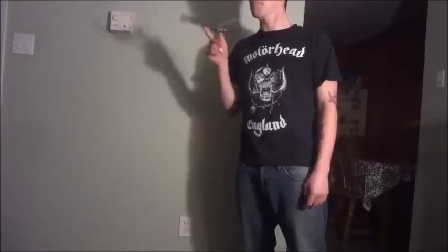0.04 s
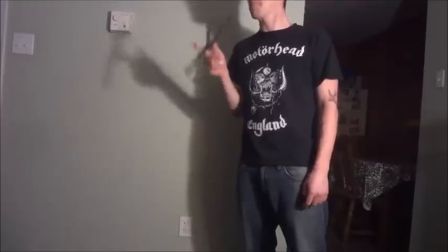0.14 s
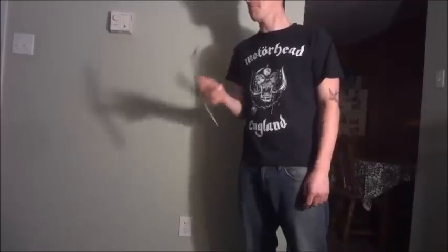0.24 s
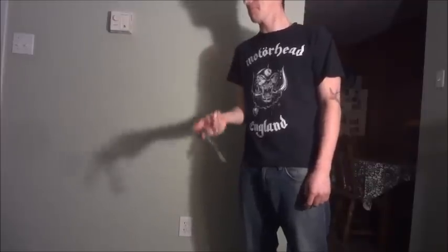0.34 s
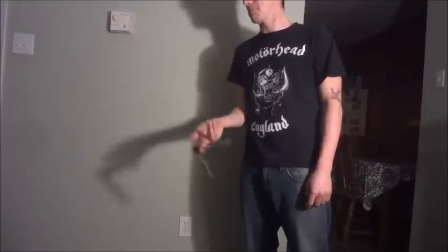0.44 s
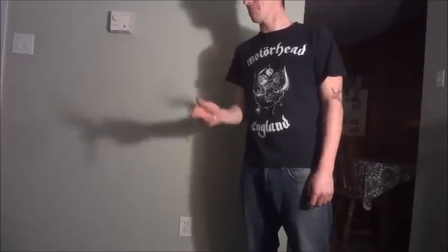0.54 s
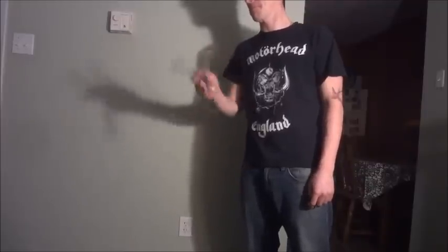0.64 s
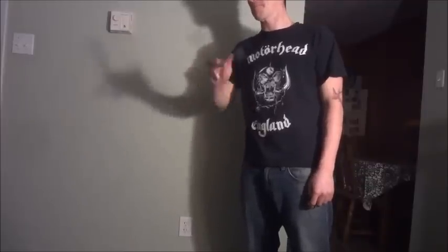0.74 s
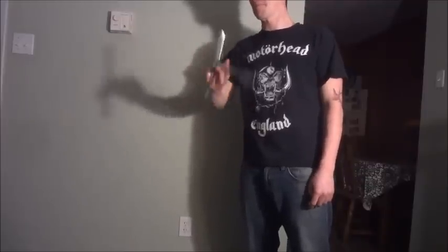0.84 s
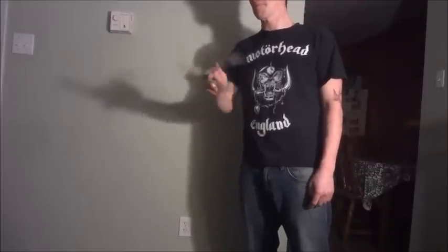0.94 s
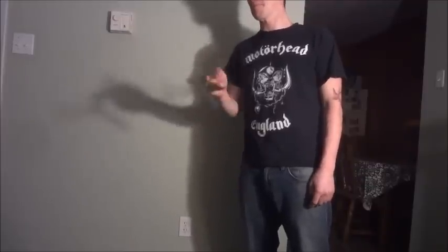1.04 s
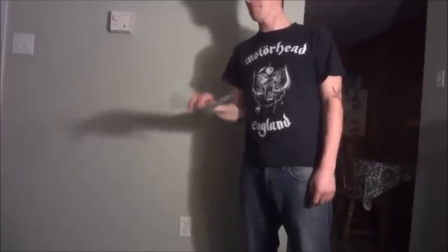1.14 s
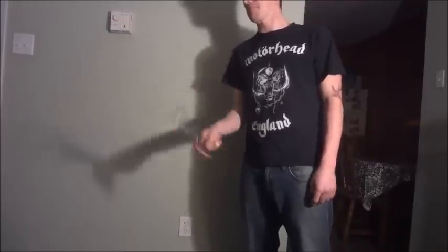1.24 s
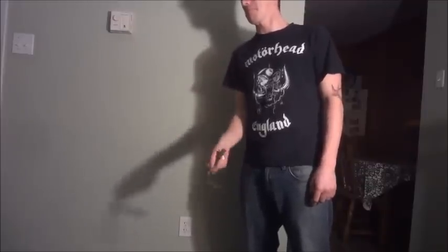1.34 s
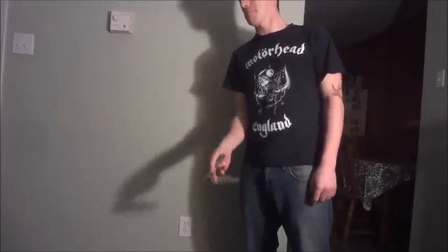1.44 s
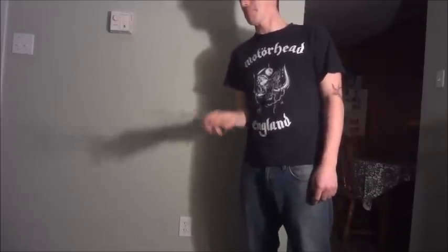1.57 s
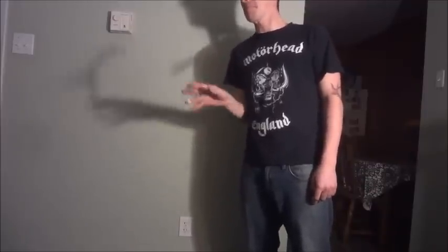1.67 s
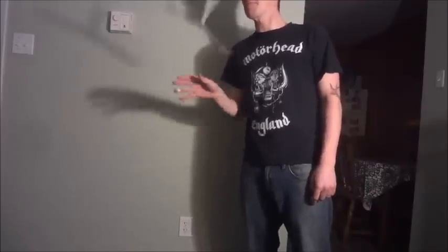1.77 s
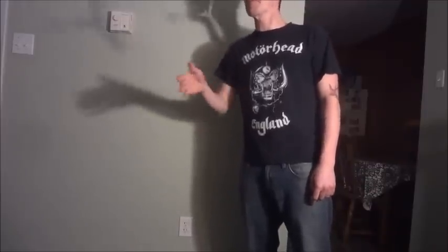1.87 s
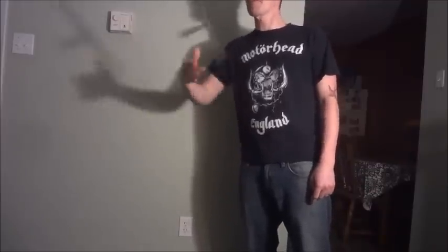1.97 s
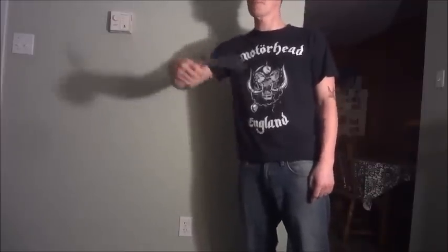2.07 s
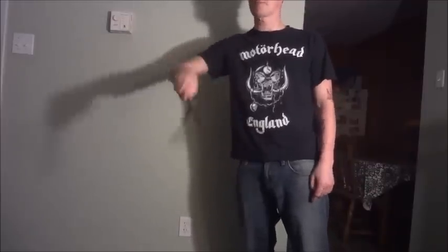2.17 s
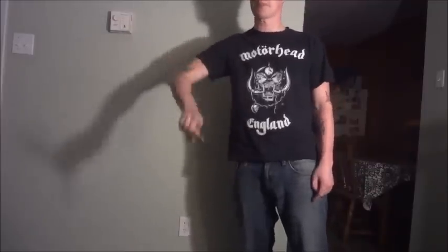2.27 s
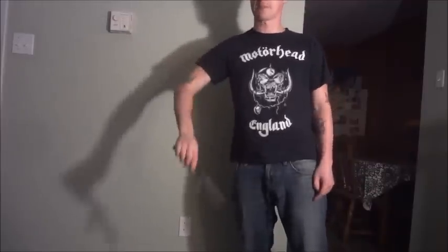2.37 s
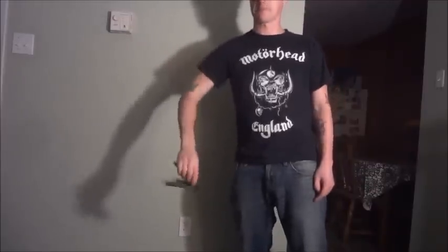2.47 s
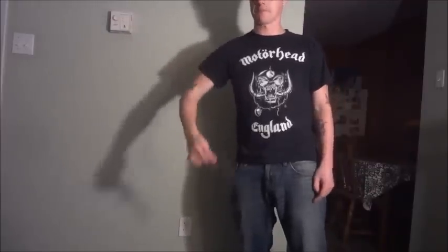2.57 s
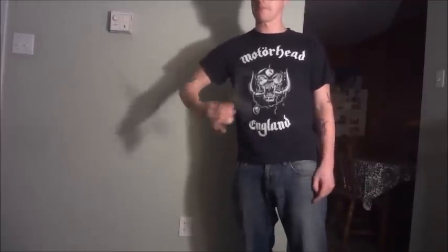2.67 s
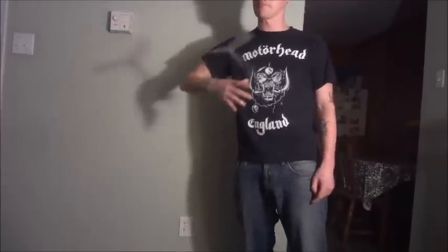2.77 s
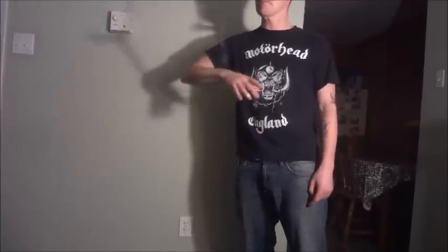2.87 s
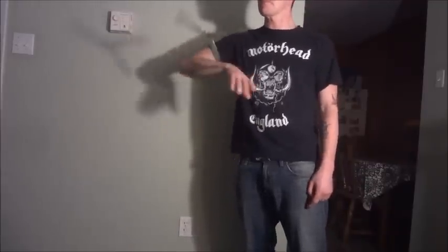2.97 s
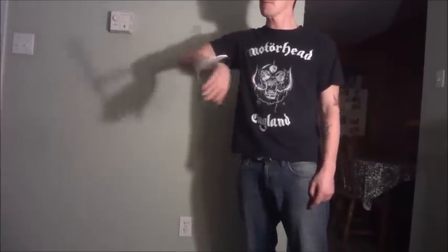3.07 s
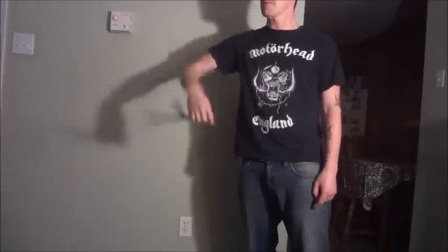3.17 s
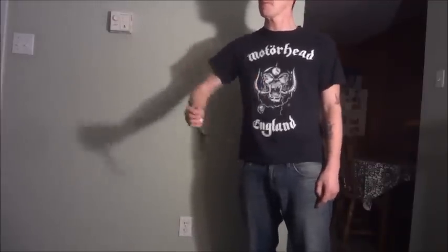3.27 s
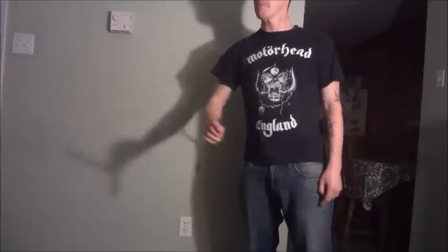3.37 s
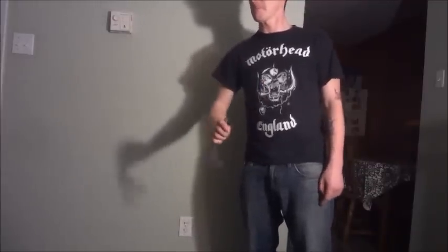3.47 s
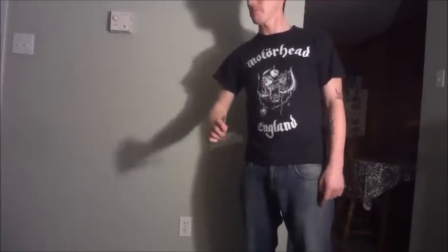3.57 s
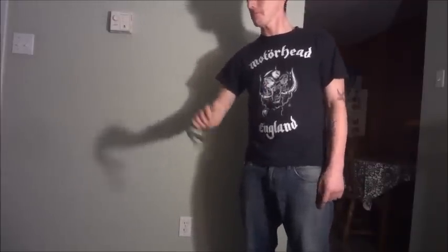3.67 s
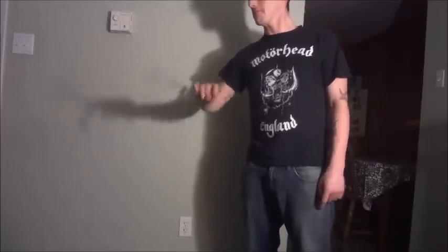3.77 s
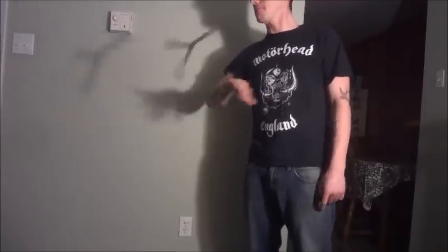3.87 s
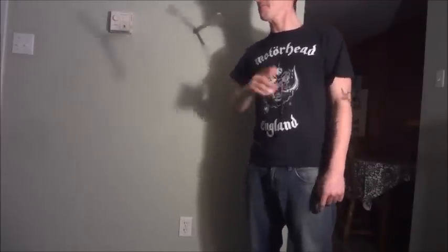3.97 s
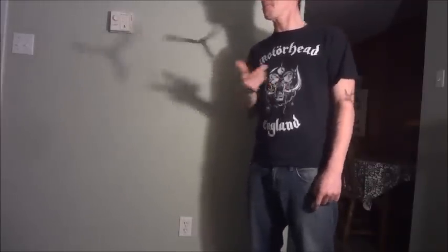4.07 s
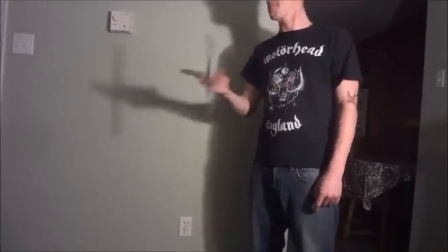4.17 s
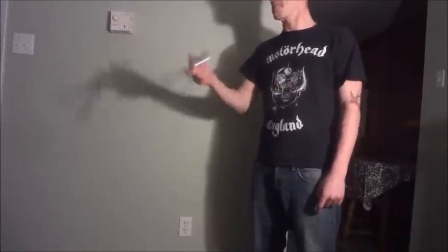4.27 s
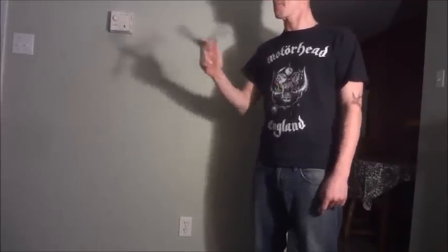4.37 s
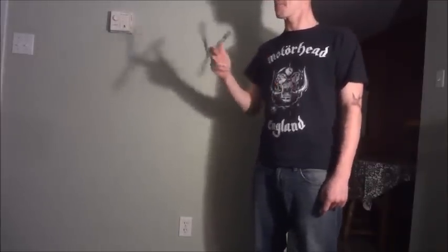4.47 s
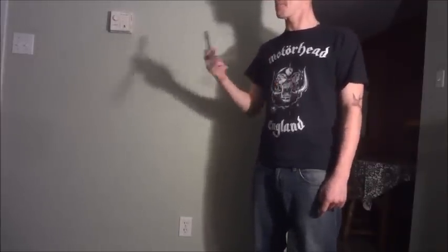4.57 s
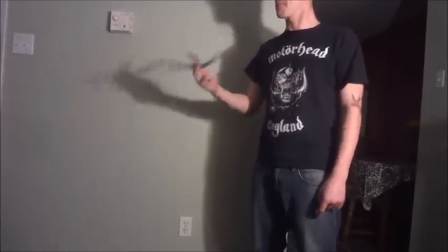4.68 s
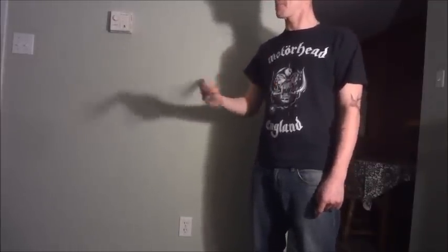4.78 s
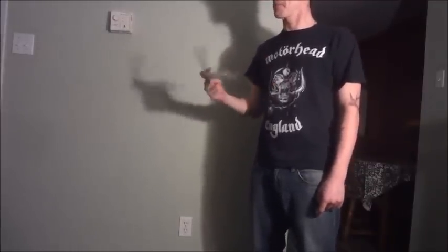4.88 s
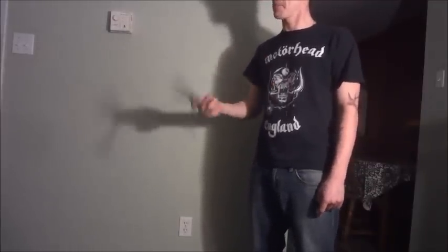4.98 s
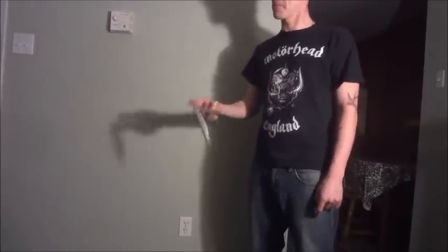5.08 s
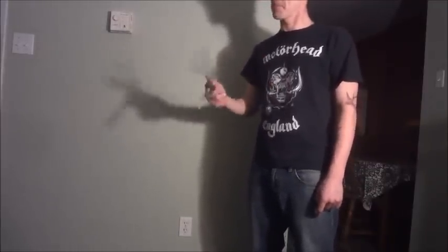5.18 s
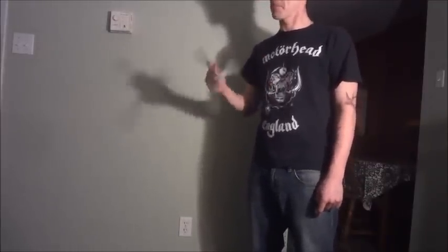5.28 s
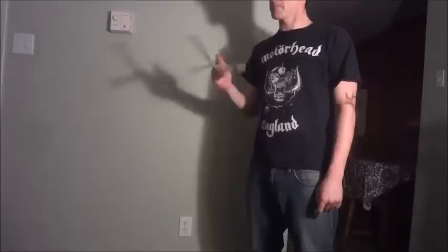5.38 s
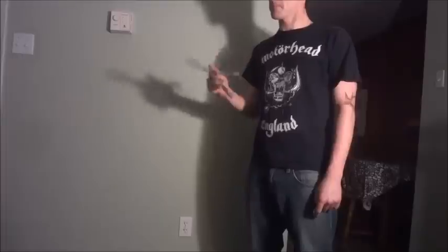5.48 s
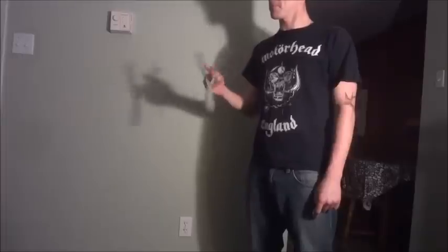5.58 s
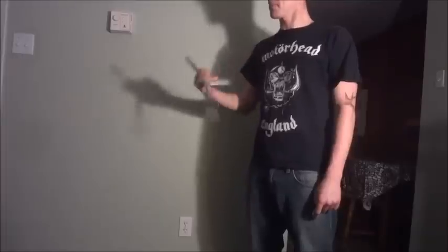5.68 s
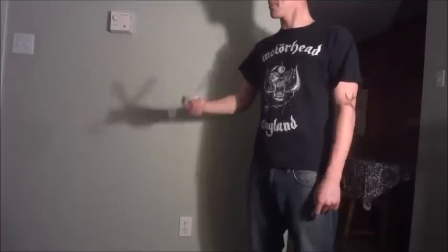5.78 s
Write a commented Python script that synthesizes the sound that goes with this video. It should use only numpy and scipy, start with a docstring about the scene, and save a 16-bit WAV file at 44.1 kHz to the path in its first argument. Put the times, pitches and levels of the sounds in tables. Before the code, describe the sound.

Sharp, irregular steel clacks and tiny loose-pivot chatter come in bursts as a butterfly knife is flipped indoors, over quiet electrical hum.

```python
"""A folding knife with two swinging handles is flipped a few metres away in a small bare room.
First only hum, thin whines and hiss are heard; from 0.4 s to 5.8 s the handles click in groups. Each click is
a crack of noise with ringing steel, then a chatter of tiny blows. After clacks the loose pivots rattle
and parts of the knife sing fading, fluttering notes; a few catches in the palm add soft thuds of low noise.
A near wall answers each sound at once, then the room fades fast as dying bands of noise."""
import sys
import numpy as np
from scipy import signal
from scipy.fft import rfft, irfft, next_fast_len
from scipy.io import wavfile

SR = 44100
rng = np.random.default_rng(int(sys.argv[2]) if len(sys.argv) > 2 else 0)


def file_out(sig):
    """Save sig as 16-bit WAV at sys.argv[1]."""
    # one column per channel
    cols = np.atleast_2d(sig).T
    # limit, then scale
    lim = np.clip(cols, -1, 1)
    pcm = np.round(lim * 32767).astype(np.int16)
    wavfile.write(sys.argv[1], SR, pcm)


N = 256662  # length in samples

# Steel hits steel: t/s, level/dB, centre of brightness f/Hz
CLICK_EVENTS = [(.411, -36, 11000), (0.4886, -16, 8700), (0.5087, -9, 8200), (0.5257, -15.5, 9100),
                (0.5378, -13.5, 9200), (0.6304, -26, 11200), (0.6753, -33, 10800), (.756, -47, 9300),
                (.8862, -44.5, 7500), (0.9267, -11.5, 10600), (0.9442, -14, 9450), (0.9697, -1.5, 10500),
                (1.032, -20.5, 9300), (1.2933, -42.5, 10600), (1.372, -46, 10000), (1.4132, -41, 10900),
                (1.4447, -43.5, 10100), (1.482, -41, 11600), (1.5335, -15.5, 10300), (1.5385, -17, 9900),
                (1.5451, -10.5, 9800), (1.6636, -21.5, 11300), (2.1121, -43, 10000), (2.1378, -39, 11000),
                (2.1593, -28, 11500), (2.2102, -33.5, 11300), (2.2338, -10.5, 10300), (2.2553, -27, 10000),
                (2.4596, -39, 10760), (2.5456, -37.5, 9000), (2.5763, -8, 9900), (2.7566, -37.5, 10740),
                (3.1917, -42, 8900), (3.3131, -34, 9900), (3.3902, -10.5, 8540), (3.4151, -16, 9900),
                (3.5369, -32, 9600), (3.5655, -26.5, 10900), (3.6632, -33.5, 9700), (3.6888, -11.5, 9600),
                (3.7126, -12, 10100), (3.886, -39, 10900), (4.2963, -33, 9100), (4.3, -27, 11700),
                (4.3542, -29, 12000), (4.3819, -17, 9900), (4.387, -18, 9200), (4.3996, -32, 9900),
                (4.4589, -23, 11500), (4.5026, -38, 9600), (4.5219, -25, 9300), (4.5529, -9, 11500),
                (4.5685, -23, 10600), (4.7259, -36, 10500), (4.7848, -45, 9850), (4.8119, -37, 11240),
                (4.8475, -35.5, 9900), (4.887, -11.5, 11500), (4.9249, -10, 9500), (4.9598, -24, 9900),
                (5.087, -45, 8600), (5.1317, -12, 7100), (5.1579, -9, 10700), (5.1951, -6.5, 11500),
                (5.3185, -38, 11600), (5.3773, -40, 11000), (5.4212, -6, 10800), (5.5762, -8.5, 10300),
                (5.6046, -26, 10100), (5.7936, -33, 10700)]
# Bright modes (natural ringing notes) of the handles: f/Hz, relative level/dB, time to fade 60 dB t60/s
BRIGHT_MODES = [(5120, 3, 0.014), (6200, -29, 0.014), (7055, -2.5, 0.052), (7700, -5.5, 0.052),
                (8270, -7, 0.04), (9640, -3.5, 0.01), (11070, -6.5, 0.0073), (11900, -2, 0.01),
                (12090, -6.5, 0.0067), (13890, -6, 0.005), (15900, 1, .015)]


def undb(db):
    """Turn a level in dB into a plain gain."""
    return 10 ** (np.asarray(db) / 20)


def unit(x):
    """Scale a sound to an average strength (rms) of 1."""
    return x / np.sqrt(np.mean(x ** 2))


def colour(x, points):
    """Make some pitches louder or softer, following (Hz, dB) points joined up along log frequency."""
    hz, db = np.transpose(points)
    f = np.arange(len(x) // 2 + 1) * SR / len(x)
    gain = undb(np.interp(np.log(f + 1), np.log(hz), db))
    return irfft(rfft(x) * gain, len(x))


def train(times, sizes):
    """Place single-sample impulses of the given sizes at the given times."""
    return np.bincount((times * SR).astype(int), sizes, N + SR)[:N]


def ring(x, hz, t60):
    """One mode set ringing by x: each impulse starts a sine of its size that fades 60 dB in t60 seconds."""
    radius = np.exp(-np.log(1000) / (t60 * SR))
    w = 2 * np.pi * hz / SR
    return signal.lfilter([0, np.sin(w)], [1, -2 * radius * np.cos(w), radius * radius], x)


def narrow(hz, width_hz):
    """A wavering tone: noise keeps a resonance ringing in a narrow band, rms 1."""
    t60 = np.log(1000) / (np.pi * width_hz)
    return unit(ring(rng.standard_normal(N), hz, t60))


def background():
    """Mains hum, thin whines and hiss; the hiss differs left and right mostly in the middle range."""
    # Every level in the hum and whine tables is before the final lift and dips.
    # Mains hum: f/Hz, level/dB
    hum_tones = [(59.2, -61.5), (118.4, -65.5), (177.6, -58), (209.9, -60.5), (236.9, -56.5)]
    # Thin whines: f/Hz, width/Hz, level/dB
    whine_bands = [(1700, 92, -67.5), (3580, 74, -74.5), (5230, 50, -74), (6260, 30, -73),
                   (7350, 41, -67.5), (10300, 140, -71), (11000, 74, -74.5)]
    # Shape of the hiss: f/Hz, relative level per Hz/dB
    hiss_shape = [(25, -25.5), (42, -0.5), (141, -21.5), (168, -2.5), (226, -7.5), (638, -20.5),
                  (1370, -26.5), (1720, -24), (3030, -29), (3600, -30), (4970, -30), (7570, -35.5),
                  (8150, -29), (10400, -36.5), (15500, -35.5)]
    # How far the sideways hiss lies above the middle: f/Hz, side minus mid/dB
    hiss_side_shape = [(60, -26), (110, -12), (200, -12.5), (380, -5.5), (700, 1), (1290, 4), (2380, 0),
                       (4400, -1.5), (8120, -7.5), (15000, -6)]
    # The background sinks after three clacks and creeps back: t/s, change of level/dB
    dips = [(.97, -5), (4.549, -5), (5.161, -3)]
    hiss_db, lift_db = -55.5, 4  # hiss before the lift, then the lift of the whole background
    recovery_s = 1  # time for a dip to shrink to about a third

    t = np.arange(N) / SR
    hiss = colour(rng.standard_normal(N), hiss_shape)
    hiss_gain = undb(hiss_db) / np.sqrt(np.mean(hiss ** 2))
    side_hiss = colour(colour(rng.standard_normal(N), hiss_shape), hiss_side_shape) * hiss_gain

    hum = np.zeros(N)
    for hz, db in hum_tones:
        steady = 0.66 * np.sin(2 * np.pi * hz * t)
        wavering = 0.5 * narrow(hz, 2.0)
        hum += undb(db) * (steady + wavering)

    whine = np.zeros(N)
    for hz, width_hz, db in whine_bands:
        whine += undb(db) * narrow(hz, width_hz)

    dip_db = np.zeros(N)
    for s, db in dips:
        dip_db += db * (t > s) * np.exp(-np.abs(t - s) / recovery_s)
    return np.array([hiss * hiss_gain + hum + whine, side_hiss]) * undb(lift_db + dip_db)


def room(x):
    """Direct sound, the slap of the near wall, then a dense tail that fades band by band; (mid, side)."""
    # Fading of the room: f/Hz, t60/s, level/dB
    tail_bands = [(660, 0.78, -9), (1930, 0.31, -2), (5130, 0.3, -2.5), (7800, 0.31, -4.5),
                  (11900, 0.21, -5.5), (15000, .22, -11.5)]
    # How far the sideways tail lies above the middle: f/Hz, side minus mid/dB
    tail_side_shape = [(700, -11.5), (2400, -25.5), (5000, -15), (9000, -11), (15000, -5)]
    wall_s, wall_db = .0038, -17  # delay and level of the slap

    t = np.arange(next_fast_len(SR // 2)) / SR
    log_hz = np.log(np.arange(len(t) // 2 + 1) * SR / len(t) + 1)
    log_centres = np.log(np.array(tail_bands)[:, 0])
    tails = np.zeros((2, len(t)))
    for (_, t60, db), only_this in zip(tail_bands, np.eye(len(tail_bands))):
        band = np.sqrt(np.interp(log_hz, log_centres, only_this))  # neighbours share the power
        fade = undb(-60 * t / t60) * (1 - np.exp(-(t / 0.0021) ** 2))  # builds up in a few ms
        fade *= undb(db) / np.sqrt(np.sum(fade ** 2))
        noise = irfft(rfft(rng.standard_normal((2, len(t)))) * band, len(t))
        tails += fade * noise
    tails[0, 0] += 1  # direct sound
    tails[0, int(wall_s * SR)] += undb(wall_db)
    mid, side = signal.fftconvolve(x[None], tails, axes=1)[:, :N]
    return np.array([mid, colour(side, tail_side_shape)])


def palm():
    """The palm catches the knife with soft thuds: noise in a broad low band swells and fades."""
    # Catches: t/s, level/dB, centre f/Hz, t60/s
    catches = [(.928, -39.5, 700, 0.079), (2.109, -34.5, 380, 0.064), (2.578, -30.5, 800, 0.029),
               (3.391, -34.5, 800, 0.041), (3.692, -40, 620, 0.16), (4.292, -44.5, 540, 0.18)]
    out, t = np.zeros(N), np.arange(N) / SR
    for s, db, hz, t60 in catches:
        since = np.maximum(t - s, 0)
        swell = 1 - np.exp(-since / 0.0036)
        out += narrow(hz, 0.81 * hz) * undb(db - 60 * since / t60) * swell
    return out


def blade(waver=.7):
    """A free part's note rises quickly and dies away, fluttering as the steel turns and chatters."""
    # Parts left singing: t/s, part name, level before flutter/dB, t60/s
    notes = [(.508, "pin", -20, .04), (.533, "blade", -29, 0.18), (.675, "pivot", -39, 0.095),
             (.974, "blade", -7, .12), (1.295, "blade", -63, .15), (1.552, "blade", -21, 0.16),
             (2.16, "latch", -39, .05), (2.239, "blade", -27, 0.036), (2.585, "handle", -30, 0.065),
             (2.589, "blade", -17.5, 0.073), (2.602, "blade", -13, 0.054), (3.317, "latch", -34, 0.022),
             (3.569, "latch", -30, 0.049), (3.69, "handle", -22, 0.059), (3.702, "blade", -15.5, 0.093),
             (3.714, "blade", -14, 0.086), (4.294, "latch", -28.5, 0.083), (4.298, "grip", -43, 0.15),
             (4.387, "latch", -28, 0.057), (4.555, "blade", -17, 0.035), (4.574, "blade", -23, 0.048),
             (4.915, "handle", -40, 0.23), (4.927, "pin", -13.5, 0.02), (5.13, "pin", -9.5, 0.027),
             (5.199, "blade", -20, .1), (5.426, "latch", -28, .1), (5.578, "blade", -21.5, 0.062)]
    # Voice of each part, by name: pitch f/Hz, upper limit of flutter f/Hz, steady share (0 to 1)
    voices = {"blade": (4728, 64, 0.9), "handle": (1920, 93, .7), "latch": (5100, 430, 0.29),
              "pin": (7000, 280, .4), "grip": (1154, 55, .7), "pivot": (12600, 150, .7)}
    out, t = np.zeros(N + SR), np.arange(SR // 2) / SR
    for s, part, db, t60 in notes:
        hz, flutter_hz, steady = voices[part]
        slow_noise = signal.lfilter(*signal.butter(2, flutter_hz, fs=SR),
                                    rng.standard_normal((2, 2 * len(t))))
        # Two slow noises shake both loudness and phase; the filter's start is thrown away.
        flutter = (unit(slow_noise[0]) + 1j * unit(slow_noise[1]))[len(t):]
        turn = steady + waver * flutter
        tone = np.imag(turn * np.exp(2j * np.pi * hz * t))
        envelope = (1 - np.exp(-t / .001)) * undb(db - 60 * t / t60)
        start = int(s * SR)
        out[start:start + len(t)] += envelope * tone
    return out[:N]


def strike(times, db, centre_hz, knock_db, colour_db=0, spread=0.31, ring_db=-7.0, crack_db=-1.5):
    """Each blow shares its force among the modes, most near its centre of brightness: a crack, then a ring."""
    # Dull modes of the gripped knife: f/Hz, relative level/dB, t60/s
    dull_modes = [(1331, -17, 0.0071), (1910, -4.5, 0.0078), (2475, -3, 0.0036), (3270, -5, 0.0044),
                  (4600, -17, 0.0043)]
    crack_t60 = .004  # s

    # One random number for every mode of every blow
    chance = rng.standard_normal((len(times), len(BRIGHT_MODES) + len(dull_modes))).T
    hz, mode_db, t60 = np.transpose(BRIGHT_MODES)
    share = np.exp(-.5 * (np.log(hz[:, None] / centre_hz) / spread) ** 2)
    share *= undb(mode_db[:, None] + colour_db + 4 * chance[:len(BRIGHT_MODES)])
    share *= undb(db) / np.sqrt(np.sum(share ** 2, axis=0))

    out, fall = np.zeros(N), undb(-60 / (crack_t60 * SR))
    for f, mode_t60, part in zip(hz, t60, share):
        blows = train(times, part)
        crack = signal.lfilter([1], [1, -fall], blows) * rng.standard_normal(N)
        out += undb(ring_db) * ring(blows, f, mode_t60)
        out += undb(crack_db) * ring(crack, f, 0.0022)
    # The bright modes barely stir the air below their own pitch.
    out = signal.sosfilt(signal.butter(3, 3800., "high", fs=SR, output="sos"), out)

    for (f, dull_db, mode_t60), luck in zip(dull_modes, chance[len(BRIGHT_MODES):]):
        sizes = undb(db + knock_db + dull_db) * luck
        out += ring(train(times, sizes), f, mode_t60)
    return out


def shower(s, length, db, hz, knock_db, count, uneven_db, fade_db):
    """Many small uneven blows per row make a rattle that swells, fades and favours its own modes."""
    rise_s, own_colour_db = 0.0044, 3  # swelling time, random spread of the mode levels
    row_colour = own_colour_db * rng.standard_normal((len(s), len(BRIGHT_MODES)))
    colour_db = np.repeat(row_colour, count, axis=0).T
    columns = np.broadcast_arrays(s, length, db, hz, knock_db)
    s, length, db, hz, knock_db = (np.repeat(column, count) for column in columns)

    place, size = rng.random((len(s), 2)).T  # place runs from 0 to 1 along the rattle
    rise_db = 20 * np.log10(np.clip(length * place / rise_s, .1, 1))
    blow_db = db - uneven_db * np.log(size + 0.15) + fade_db * place + rise_db
    return strike(s + length * place, blow_db, hz, knock_db, colour_db)


def rattles():
    """Loose pivots strike many times after clacks, and briefly chatter after every click."""
    # Runs of tiny blows of the loose pivots, 6 to 83 ms long: t/s, length/s, base level of one blow/dB,
    # centre of brightness f/Hz, dull knock relative to the blow/dB
    rattle_events = [(0.4854, 0.083, -26.5, 8800, -3), (0.9236, 0.053, -24, 8400, -5),
                     (1.5301, 0.051, -23, 9400, -9), (2.151, 0.039, -41.5, 11600, -11.5),
                     (2.2285, 0.037, -28, 9000, -3), (2.5748, 0.06, -22, 9000, -7.5),
                     (3.193, 0.054, -58.5, 8850, 7), (3.305, 0.035, -56.5, 9000, 6),
                     (3.3868, 0.05, -22, 8700, -4.5), (3.561, .02, -49, 9500, 3.5),
                     (3.6857, .048, -22.5, 8700, -4), (4.285, 0.058, -39, 8500, -7.5),
                     (4.374, 0.037, -35, 8500, -2), (4.5185, 0.0065, -41, 8500, -7),
                     (4.5507, 0.024, -26.5, 11300, -39), (4.847, .04, -49, 9700, -25),
                     (4.883, .03, -26.5, 10300, -13), (4.9226, 0.028, -39.5, 9100, 0.5),
                     (5.1306, 0.072, -27, 8350, -10.5), (5.1577, .037, -23, 9500, -10.5),
                     (5.1768, 0.042, -27.5, 9100, -4.5), (5.4225, 0.03, -24, 10000, -8.5),
                     (5.571, 0.015, -30, 10700, -42)]
    chatter_s, chatter_db, chatter_knock_db = .03, -19.5, -17  # length, base level, dull knock
    chatter_follows = 0.87  # dB of chatter per dB of click: light clicks are mostly chatter

    click_s, click_db, click_hz = np.transpose(CLICK_EVENTS)
    after_clacks = shower(*np.transpose(rattle_events), count=70, uneven_db=2.5, fade_db=-10.5)
    chatter = shower(click_s, chatter_s, chatter_follows * click_db + chatter_db, click_hz,
                     chatter_knock_db, count=30, uneven_db=0.5, fade_db=-9.)
    return after_clacks + chatter


def clicks():
    """Handles hit the blade and each other: one bright blow per click, with a faint dull knock."""
    s, db, hz = np.transpose(CLICK_EVENTS)
    return strike(s, db, hz, knock_db=-26.5)


def scene():
    """Knife in the room over the background, mid and side turned to left and right."""
    knife = clicks() + rattles() + blade()
    # So small an object radiates no bass.
    knife = signal.sosfilt(signal.butter(4, 1054, "high", fs=SR, output="sos"), knife)
    mid, side = room(knife + palm()) + background()
    return np.array([mid + side, mid - side])


def record(dry):
    """The loudest treble peaks are rounded, bass is left alone; nothing is heard above about 16 kHz."""
    top_hz = 15900
    rounding = np.tanh(1.3 * dry) / 1.3 - dry  # only the change made by rounding
    treble_only = signal.butter(2, 1500, "high", fs=SR, output="sos")
    out = dry + signal.sosfiltfilt(treble_only, rounding)
    return signal.sosfilt(signal.ellip(10, .2, 70, top_hz, fs=SR, output="sos"), out)


dry = scene()
out = record(dry)
file_out(out)
```